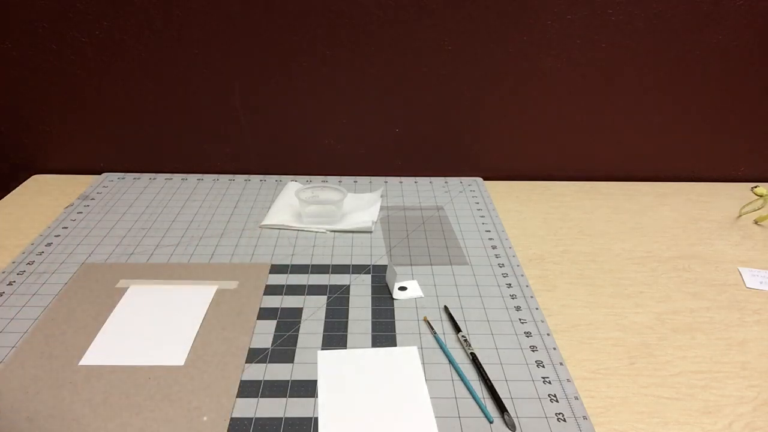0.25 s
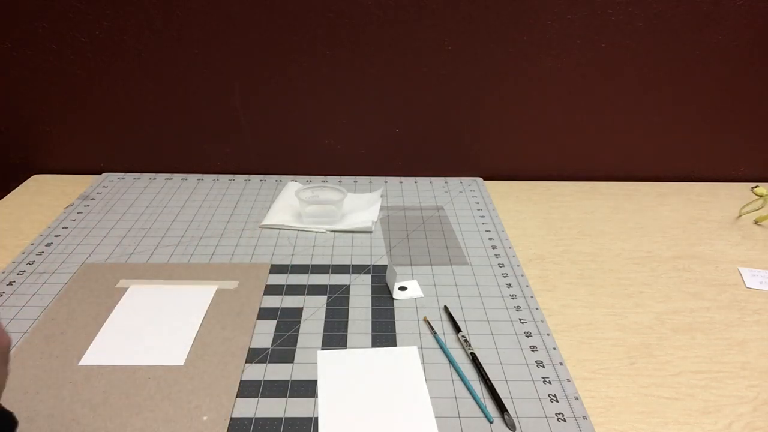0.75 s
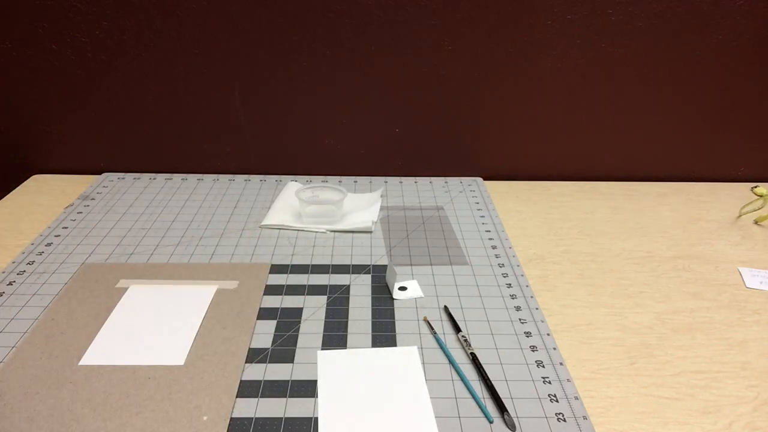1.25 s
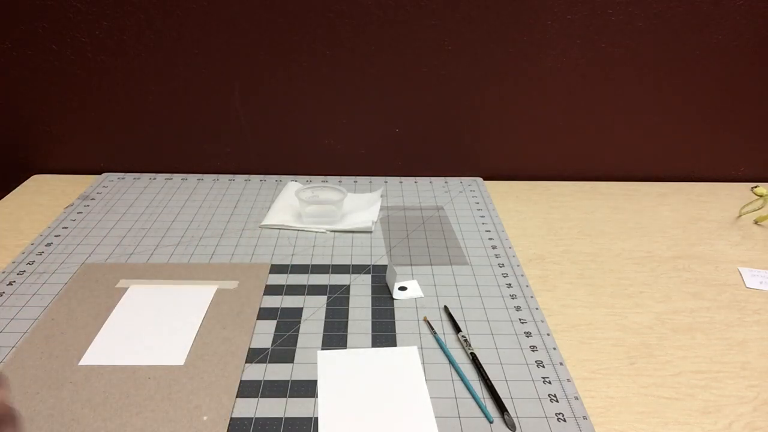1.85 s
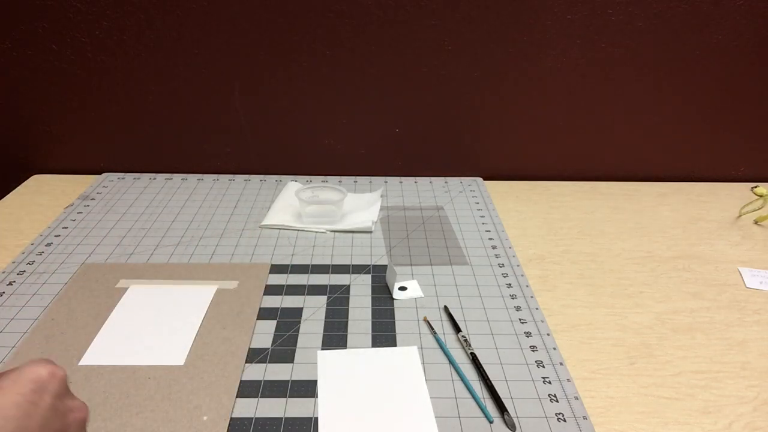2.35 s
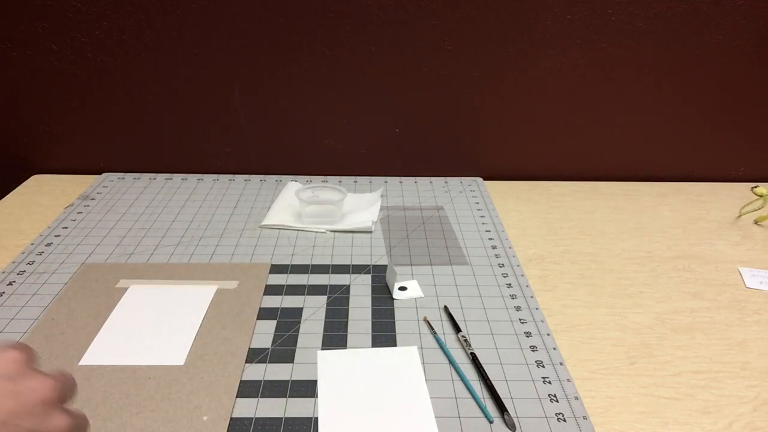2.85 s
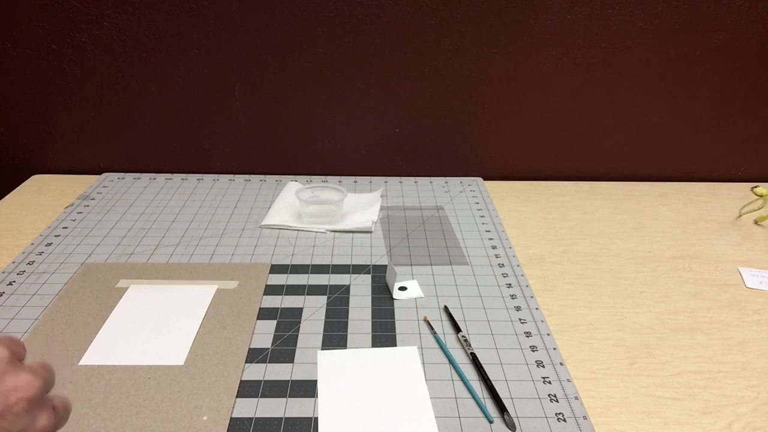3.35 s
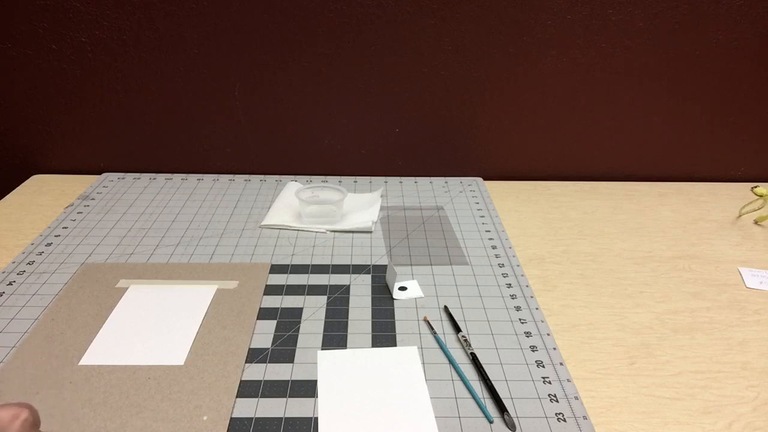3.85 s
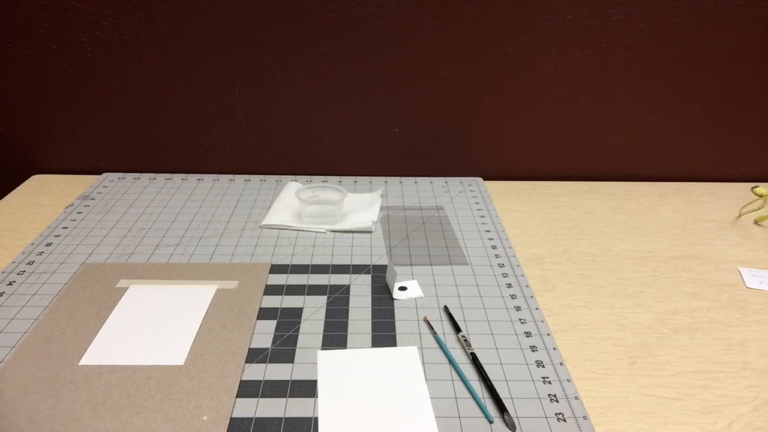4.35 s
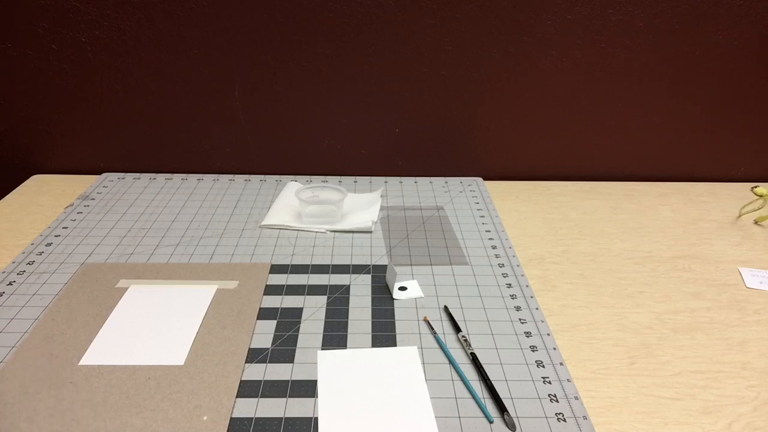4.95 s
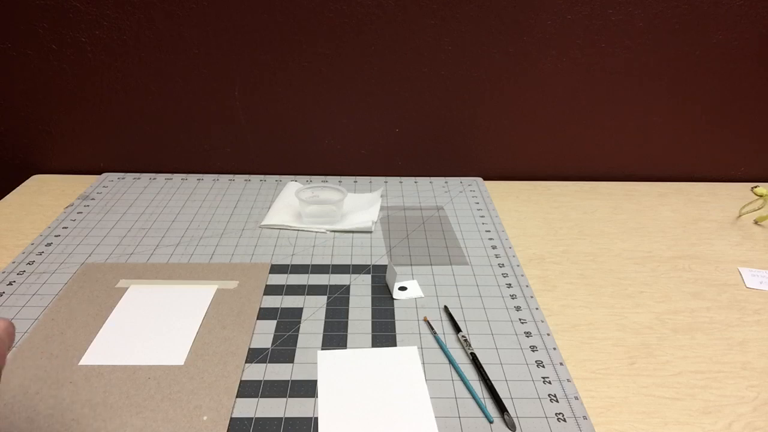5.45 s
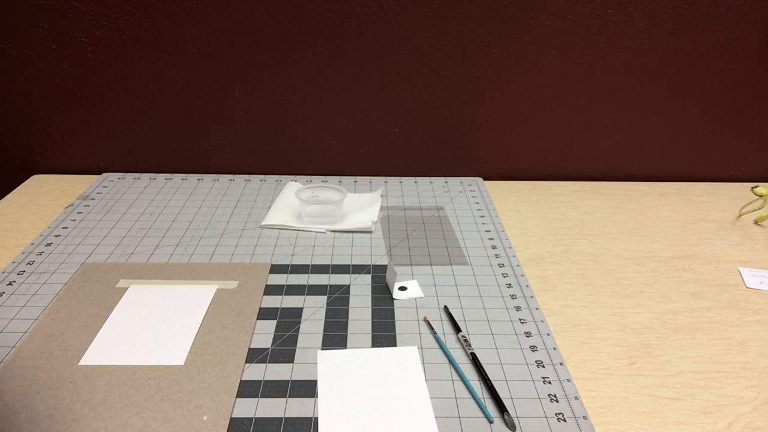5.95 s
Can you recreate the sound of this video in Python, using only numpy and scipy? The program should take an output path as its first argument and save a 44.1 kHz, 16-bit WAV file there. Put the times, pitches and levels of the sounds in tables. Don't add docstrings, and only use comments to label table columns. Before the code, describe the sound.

Close to the microphone in a small quiet room, fingers rustle faintly on masking tape. After about a second it rips with a sharp crackling burst, then more peels and brittle snaps until two seconds. Quieter rustles, sticky ticks and brief peels follow, with another crackle near five seconds. A low fan hum continues underneath.

```python
import sys
import numpy as np
from scipy import signal
from scipy.fft import rfft, irfft
from scipy.io import wavfile

SR = 44100
rng = np.random.default_rng(int(sys.argv[2]) if len(sys.argv) > 2 else 0)


def store_wav(level_fs):
    pcm = np.round(np.clip(np.atleast_2d(level_fs), -1, 1) * 32767)
    wavfile.write(sys.argv[1], SR, pcm.T.astype(np.int16))


def boost(x):
    u = np.asarray(x, float) / 20
    return 10 ** u


N = 273480


def rms_one(x):
    return x / np.sqrt(np.mean(x ** 2) + 1e-20)


def peak_one(x):
    return x / np.abs(x).max()


def at_hz(points, hz):
    table_hz, values = np.array(points).T
    return np.interp(np.log(hz), np.log(table_hz), values)


def resonate(x, hz, width_hz):
    r = np.exp(-np.pi * width_hz / SR)
    zeros = np.array([1, 0, -1]) * (1 - r * r) / 2
    poles = [1, -2 * r * np.cos(2 * np.pi * hz / SR), r * r]
    return signal.lfilter(zeros, poles, x)


def bandpass(x, edges_hz):
    return signal.sosfilt(signal.butter(2, edges_hz, "band", fs=SR, output="sos"), x)


def colour(x, spectrum):
    hz = np.fft.rfftfreq(len(x), 1 / SR) + 1
    return irfft(rfft(x) * boost(at_hz(spectrum, hz)), len(x))


def split(x):
    body = bandpass(x, (450, 2700))
    middle = -bandpass(x, (2700, 8500))
    top = bandpass(x, (8500, 17500))
    return body, middle, top


def drift(rate_hz):
    r = np.exp(-2 * np.pi * rate_hz / SR)
    slow = signal.lfilter([1], [1, -2 * r, r * r], rng.standard_normal(N + SR))
    return rms_one(slow[SR:])


def room_tone():
    # frequency in Hz, density in dB per Hz.
    air = [(15, -73), (25, -49), (62, -10), (108, -11), (180, -12), (236, -17), (309, -17), (370, -22),
           (516, -36.5), (607, -52), (1050, -63), (1890, -58), (16000, -67.5)]
    # frequency in Hz, width in Hz, level in dB.
    hum = [(46, 3, -77), (69.5, 5, -63), (82, 7, -64), (103, 9, -62), (119, 6, -67), (138.5, 5, -59.5),
           (175, 8, -63), (209, 9, -71), (236, 9, -72), (262, 4, -74), (304, 10, -67), (330, 6, -72),
           (361, 5, -77)]
    floor = boost(-53.5 - 6) * rms_one(colour(rng.standard_normal(N), air))
    modes = 0
    for hz, width_hz, db in hum:
        mode = resonate(rng.standard_normal(N + SR), hz, width_hz)[SR:]
        modes = modes + boost(db) * rms_one(mode)
    fan_hz, fan_db, sway_db = 107.25, -55, 1.5
    tone = np.sqrt(2) * np.sin(2 * np.pi * fan_hz * np.arange(N) / SR)
    return floor + modes + boost(fan_db + sway_db * drift(1.5)) * tone


def room(x):
    # frequency in Hz, time to fall 60 dB in seconds.
    decay = [(500, 0.38), (2000, 0.2), (6000, 0.23), (15000, 0.17)]
    walls_s, table_s = .0062, .0032
    walls_db, table_db = -2.5, -7.5
    t = np.arange(SR // 2) / SR
    tails = 0
    for low in 300 * 2. ** np.arange(6):
        band = bandpass(rng.standard_normal((4, len(t))), [low, 2 * low])
        tails = tails + band * boost(-60 * t / at_hz(decay, low * np.sqrt(2)))
    tails = tails * np.clip((t - walls_s) / 0.00033, .06 * (t > table_s), 1)
    tails = boost(walls_db) * tails / np.sqrt(np.sum(tails ** 2, axis=1, keepdims=True))
    places = np.array([drift(3) for _ in tails])
    places = places / np.sqrt(np.sum(places ** 2, axis=0))
    table = boost(table_db) * np.pad(x, (round(table_s * SR), 0))[:N]
    walls = signal.fftconvolve(x * places, tails, axes=1)[:, :N].sum(axis=0)
    return table + walls


def knocks():
    # start in seconds, peak in dB, frequency in Hz, time to fall 60 dB in seconds.
    taps = [(.256, -54, 1010, 0.019), (1.046, -28, 1654, 0.027), (1.047, -31, 790, .035),
            (1.048, -33, 1150, .03), (1.048, -40, 400, .06), (2.089, -40, 800, 0.018),
            (2.087, -51, 1480, .025), (2.087, -47, 2650, 0.018), (2.094, -49, 450, 0.038),
            (2.351, -53.5, 2330, 0.027), (2.967, -57, 1230, .025), (2.97, -56, 2090, .025),
            (3.131, -51, 1900, .03), (3.96, -60, 1950, 0.033), (4.158, -54, 1340, .012),
            (4.214, -57, 1340, .015), (5.186, -44, 2450, 0.023), (5.187, -50, 3950, .015),
            (5.288, -59, 1300, .02), (5.288, -60, 2900, .015), (2.088, -43, 3150, .014),
            (5.186, -50, 900, .015), (5.47, -56, 595, .04), (5.447, -46, 3500, 0.014),
            (2.535, -54, 3370, .01), (5.955, -65, 1284, .04)]
    out, t = np.zeros(N + 8192), np.arange(8192) / SR
    for s, db, hz, t60 in taps:
        at = round(s * SR)
        push = 1 - np.exp(-t * hz)
        out[at:at + 8192] += boost(db - 60 * t / t60) * push * np.sin(2 * np.pi * hz * t)
    return out[:N]


def hand():
    # height in seconds, slip hiss in dB,
    # time to fall 20 dB in seconds, body in dB, top in dB.
    jerks = [(0.0, -71, .1, 4, 8), (.245, -64, .03, -6, 6), (.488, -62, .03, -14, 13),
             (.349, -61, .11, -6, -4), (1.015, -43, .05, 2, 9), (1.0455, -32, .022, 0, 6),
             (1.06, -51, .33, -1, -5), (1.196, -50, .1, -4, 5), (1.353, -52, .25, 0, 6),
             (1.594, -43, .03, -18, 8), (1.681, -49, .055, -12, 11), (1.934, -60, .11, 0, 16),
             (2.088, -60, .04, -6, 10), (3.116, -60, .03, -9, 3), (3.501, -64, .06, -18, 9),
             (4.599, -60, .012, -15, 10), (4.605, -65, .07, -21, 9), (4.762, -58, .1, -19, 8),
             (5.1875, -50, .011, -14, 8), (5.2, -64, .12, -16, 3), (5.284, -71, .2, -2, 10),
             (5.408, -66, .08, 3, 9), (5.521, -69, .07, -2, 9), (6.063, -60.5, .03, -26, 10)]
    tugs = [(.085, -78, .25, 7, 6), (.256, -54, .025, 1, 9), (.29, -72, .15, -12, 12),
            (.486, -65, .24, -12, 12), (.69, -65, .12, -18, 8), (1.495, -45.5, .15, -13, 4),
            (1.723, -64, .35, -5, 7), (2.14, -77, .6, -4, 4), (2.352, -66, .12, -6, 12),
            (2.54, -56, .032, -15, 11), (2.78, -72, .04, -12, 12), (1.185, -62, .03, -14, 12),
            (2.832, -63.5, .08, -12, 10), (3.134, -54, .04, -14, 5), (3.959, -76, .3, 4, 2),
            (4.01, -74, .06, -2, 3), (4.16, -80, .1, 0, 9), (4.215, -74, .11, 2, 1), (4.91, -69, .1, 5, -4),
            (4.974, -67, .18, 2, 3), (5.38, -76, .06, -8, 12), (5.819, -72, .12, -19, 3),
            (5.955, -72, .06, 4, 2), (6.053, -69, .025, -14, 11), (6.1, -69, .35, -14, 6)]
    # height in seconds, slip hiss in dB,
    # time from there to 20 dB down in seconds, body in dB, top in dB.
    pulls = [(.46, -76, .06, -8, 12), (.63, -76, .08, -10, 6), (.78, -66, .06, -14, 10),
             (.835, -55, .065, -16, 5), (.89, -63, .06, -12, 8), (.98, -59, .09, -9, 5),
             (1.215, -45, .033, -10, 7), (1.391, -51, .09, -3, 7), (1.53, -44, .065, -26, 4),
             (1.92, -59, .06, -15, 10), (2.06, -68, .05, -18, 9), (2.32, -71, .08, -11, 13),
             (2.5, -71, .05, -18, 3), (2.69, -53.5, .05, -9, 5), (2.975, -63, .055, -12, 10),
             (3.06, -64, .05, -16, 3), (3.18, -62, .075, -15, 7), (3.396, -69, .045, -19, 8),
             (3.66, -69, .1, -10, 6), (3.82, -71, .16, -12, 6), (4.83, -50, .06, -7, 9),
             (5.045, -65, .07, -23, 7), (5.17, -67, .04, -9, -1), (5.452, -58, .03, 0, -10)]
    jerk_rise_s, tug_rise_s = .0037, .023
    pull_roundness = 1.6
    moves = [(row, jerk_rise_s, 1) for row in jerks]
    moves += [(row, tug_rise_s, 1) for row in tugs]
    moves += [(row, row[2], pull_roundness) for row in pulls]

    t = np.arange(0, N + 32, 16) / SR
    rest_db = -87 + np.array([[-8], [0], [6]])
    power = np.ones((3, len(t))) * boost(rest_db) ** 2
    for (s, db, fall, body_db, top_db), rise, bend in moves:
        away = np.where(t < s, (s - t) / rise, (t - s) / fall)
        shape = boost(db - 20 * away ** bend)
        thinner_db = max(db + 42, 0)
        power += (shape * boost([[body_db - thinner_db], [0], [top_db]])) ** 2
    return [np.interp(np.arange(N) / SR, t, row) for row in np.sqrt(power)]


def slips():
    slips_per_s, spread_db, clump_db = 6500, 2.7, 2.2
    largest = 2.8
    sizes = boost(spread_db * np.minimum(rng.exponential(1, N), largest)) * rng.choice([-1, 1], N)
    born = rng.random(N) < slips_per_s / SR
    return sizes * born * boost(clump_db * drift(150))


def taut_strip(x, hz):
    width_hz = 700
    out, state, r = np.zeros(N), np.zeros(2), np.exp(-np.pi * width_hz / SR)
    for i in range(0, N, 256):
        poles = [1, -2 * r * np.cos(2 * np.pi * hz[i] / SR), r * r]
        out[i:i + 256], state = signal.lfilter([1, 0, -1], poles, x[i:i + 256], zi=state)
    return rms_one(out)


def buzzes(grains):
    # height in seconds, level in dB, frequency in Hz,
    # width in Hz, time to fall 20 dB in seconds.
    flaps = [(.02, -72, 850, 500, .1), (.025, -72, 8800, 600, .04), (.095, -74, 1300, 500, .05),
             (.197, -70, 1570, 500, .025), (.25, -72, 790, 200, .03), (.387, -72, 1980, 600, .015),
             (.693, -70, 2800, 400, .03), (.845, -59, 5600, 900, .05), (1.022, -58, 1400, 400, .04),
             (1.051, -37.5, 6200, 900, .012), (1.059, -38.5, 6600, 800, .008), (1.065, -52, 1400, 300, .1),
             (1.125, -63, 1000, 200, .06), (1.13, -62, 1700, 250, .08), (1.208, -58, 760, 250, .035),
             (1.218, -54, 3700, 900, .03), (1.362, -56, 1500, 900, .07), (1.395, -55, 2200, 450, .05),
             (1.425, -60, 2400, 250, .08), (1.487, -60, 2100, 700, .05), (1.535, -58, 2500, 500, .05),
             (1.64, -69, 2300, 300, .08), (1.726, -72, 1570, 250, .06), (1.96, -70, 1300, 250, .12),
             (2.052, -69, 3960, 500, .04), (2.66, -69, 3140, 500, .08), (3.055, -63, 6400, 500, .04),
             (3.055, -72, 5000, 500, .04), (3.135, -61, 8800, 1100, .03), (3.135, -60, 5900, 1500, .03),
             (3.15, -74, 1950, 350, .12), (4.795, -63, 2250, 400, .08), (4.97, -78, 1400, 400, .06),
             (5.2, -64, 2580, 400, .07), (5.25, -70, 2450, 350, .1), (5.21, -65, 4100, 500, .06),
             (5.315, -73, 2950, 300, .06), (5.43, -66, 2800, 400, .05), (5.97, -78, 1300, 300, .08),
             (6.07, -64, 8200, 2000, .08)]
    crumples = [(.695, -61, 4200, 2500, .02), (.843, -53, 4600, 2000, .025),
                (1.056, -42, 11500, 3000, .015), (5.194, -56, 11000, 4000, .03),
                (5.196, -59, 3400, 1500, .04), (.812, -56, 4500, 2000, .03), (1.07, -48, 12300, 2000, .06),
                (1.603, -50, 13000, 2500, .04), (1.948, -57, 3400, 1200, .08), (3.2, -66, 12000, 3000, .02),
                (4.605, -66, 15300, 1000, .04), (4.606, -63, 11000, 3500, .05),
                (5.452, -52, 3500, 2000, .03), (5.968, -74, 3500, 250, .04)]
    rise_s = .025
    out, t = np.zeros(N + 16384), np.arange(-4096, 12288) / SR
    for s, db, hz, width_hz, fall in flaps + crumples:
        at = max(round(s * SR) - 4096, 0)
        driven = np.resize(grains[at:], 16384)
        for _ in range(2):
            driven = resonate(driven, hz, 1.5 * width_hz)
        ring = rms_one(driven) * boost(db - 20 * np.where(t < 0, -t / rise_s, t / fall))
        skip = at + 4096 - round(s * SR)
        out[at:at + 16384 - skip] += ring[skip:]
    return out[:N]


def snaps():
    # start in seconds, crack peak in dB,
    # ring of the strip in Hz, knock in dB relative to the crack.
    tears = [(.8348, -47, 4060, -4), (1.0163, -33.5, 4930, -16), (1.035, -38, 14500, -20),
             (1.0461, -32, 5400, -9), (1.0572, -32, 6500, -26), (1.1964, -38.5, 3530, -13),
             (1.2232, -50, 2610, -8), (1.3533, -37, 5250, -3), (1.3596, -40, 1910, -5),
             (1.3743, -40, 1940, 2), (1.3782, -39, 2090, 4), (1.3924, -35, 2290, -5),
             (1.4409, -40, 5860, -8), (1.5255, -41, 7190, -22), (1.5331, -33, 3810, -10),
             (1.5873, -41, 6460, -27), (1.5931, -27, 7060, -24), (1.681, -43, 3900, -18),
             (1.6837, -42, 3860, -26), (1.6987, -40, 4180, -20), (1.9249, -38, 14000, -25),
             (1.9346, -30, 13000, -28), (1.9357, -34, 15200, -15), (1.9434, -47, 14000, -15),
             (1.9513, -35, 15200, -18), (1.9663, -46, 15200, -15), (4.767, -42.5, 5040, -29),
             (4.8017, -44, 4390, -15), (4.8094, -42, 4050, -30), (4.8141, -40, 2620, -16)]
    ticks = [(.195, -72, 1660, 14), (.2566, -45, 5060, -8), (.3494, -49, 2660, 3), (.488, -55, 14000, -20),
             (.6798, -54, 13000, -25), (.6908, -52, 5730, -2), (.883, -52, 14000, -25),
             (2.0894, -49, 3270, -6), (2.0953, -58, 5900, -8), (2.3497, -46.5, 3460, -2),
             (2.5351, -52, 7240, -8), (2.8266, -62, 1960, -8), (2.9679, -57, 3600, -8),
             (3.0592, -56, 6520, -23), (3.119, -49, 2560, 0), (3.1316, -50, 5680, -10),
             (3.139, -51, 5600, -12), (2.0925, -52, 3250, -4), (.387, -60, 2500, 0),
             (3.383, -57, 5120, -30), (3.5018, -49, 6800, -17), (3.9593, -63, 2090, -6),
             (4.1581, -58, 1270, 4), (4.213, -52, 1850, 4), (4.5951, -43, 9500, -20),
             (4.7635, -42, 7190, -12), (5.1865, -38, 2560, -8), (5.288, -48, 5430, -5),
             (5.4083, -57, 4670, -5), (5.4448, -53, 3010, 0), (5.455, -53, 3530, -8),
             (5.5203, -41, 6570, -6), (6.063, -49, 7400, -30), (6.0662, -46, 7150, -28)]
    more_snaps = [(1.0446, -33, 7000, -12), (1.0453, -33, 9500, -14), (1.0477, -30, 10500, -12),
                  (1.0501, -30, 4700, -14), (1.0512, -29, 13500, -12), (1.0593, -32, 6500, -15),
                  (1.0629, -38, 12500, -20), (1.1878, -46, 13000, -20), (1.2253, -37, 8800, -15),
                  (1.5937, -31, 7000, -15), (1.8646, -56, 9000, -20), (2.3431, -55, 6000, -10),
                  (3.5023, -54, 9500, -20), (5.1856, -37, 5800, -10), (5.2918, -54, 9500, -15),
                  (5.5207, -46, 11000, -20), (6.0702, -52, 13500, -30), (6.1685, -60, 4600, -15),
                  (.7005, -58, 13500, -25), (2.0885, -53, 12500, -20)]
    out, t = np.zeros(N + 1024), np.arange(1024) / SR
    for s, crack_db, hz, knock_db in tears + ticks + more_snaps:
        crack = peak_one(rng.standard_normal(1024) * t * np.exp(-t / .00021))
        body, middle, top = map(peak_one, split(crack))
        ring = peak_one(resonate(crack ** 4, hz, hz * 0.14))
        top_db = -1.5 - .2 * knock_db
        ring_db = -6 + 11 * max(np.log2(hz / 8000), 0)
        snap = boost(0.5) * middle + boost(knock_db - 3) * body + boost(top_db) * top + boost(ring_db + 7) * ring
        at = round(s * SR)
        out[at:at + 1024] += boost(crack_db) * snap
    return out[:N]


def peel():
    # frequency in Hz, density in dB per Hz.
    tape_colour = [(290, 9), (500, 5), (950, 9.5), (1400, 15), (2260, 14.5), (3400, 12.5), (4800, 11.5),
                   (7200, 6.5), (9200, 9.5), (10400, 7.5), (11800, 10), (13500, 8.5), (15300, 12.5),
                   (16000, 10)]
    grains = slips()
    body, middle, top = [rms_one(band) for band in split(colour(grains, tape_colour))]
    body_level, level, top_level = hand()
    taut_db = 20 * np.log10(level / body_level)
    octaves = taut_db / 22 + .15 * drift(4)
    hz = np.clip(3000 * 2 ** octaves, 1500, 7000)
    strip = boost(-21) * taut_strip(grains, hz)
    hiss = level * (middle + strip) + body_level * body + boost(1.2) * top_level * top
    return boost(-6) * hiss + buzzes(grains)


def scene():
    tape, cracks, taps = peel(), snaps(), knocks()
    echoes = room(tape + boost(-.7) * cracks + boost(-7) * taps)
    return (tape + cracks + taps + echoes + room_tone())[None]


def top_cut(x):
    return signal.sosfilt(signal.butter(12, 16980, fs=SR, output="sos"), x)


def record(dry):
    rounded = .16 * np.tanh(dry / .16)
    mix = signal.sosfilt(signal.ellip(12, 1, 55, 15820, fs=SR, output="sos"), rounded)
    mix = signal.sosfilt(signal.butter(2, 36, "high", fs=SR, output="sos"), mix)
    return top_cut(mix)


dry = scene()
out = record(dry)
store_wav(out)
```